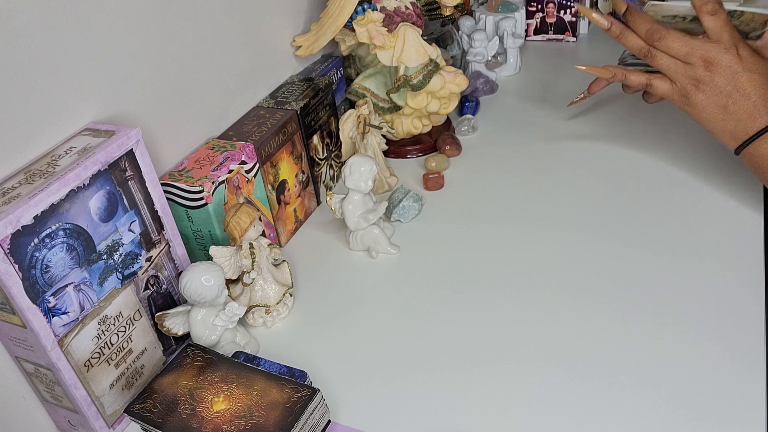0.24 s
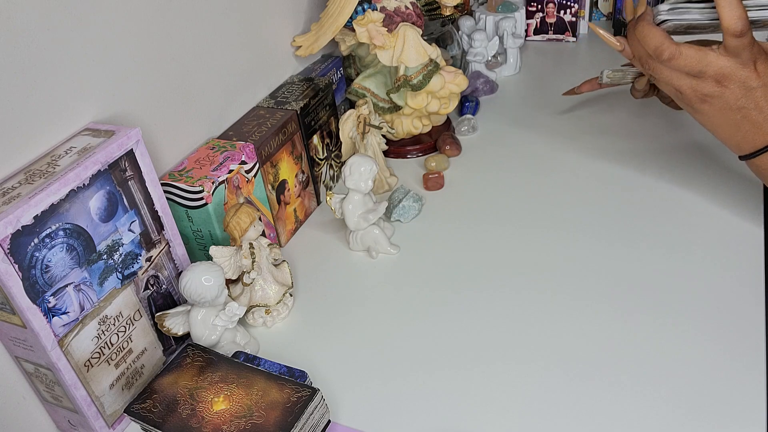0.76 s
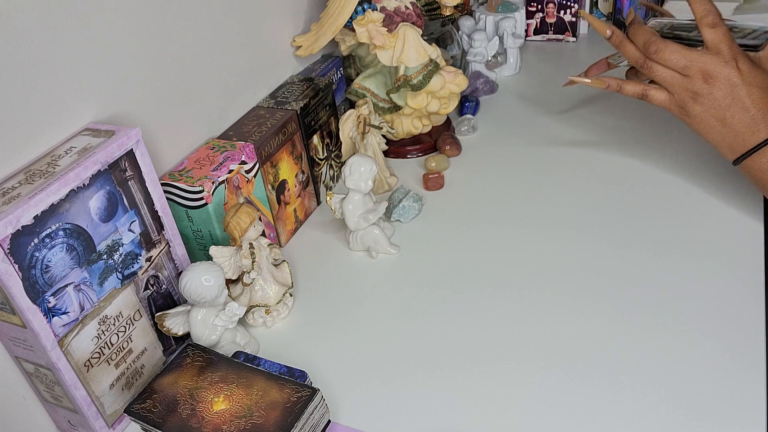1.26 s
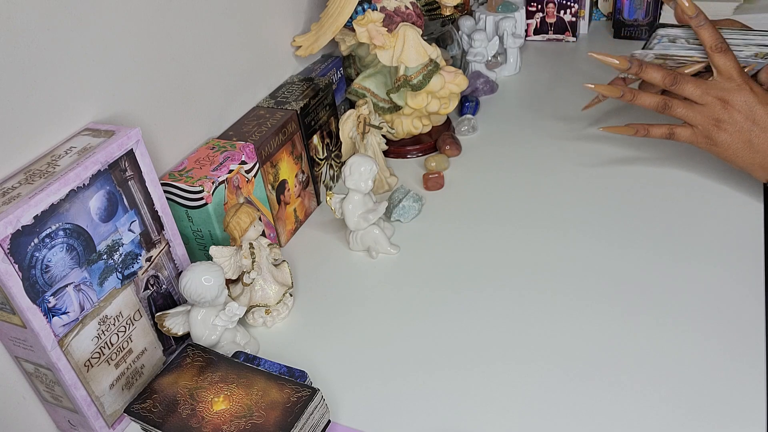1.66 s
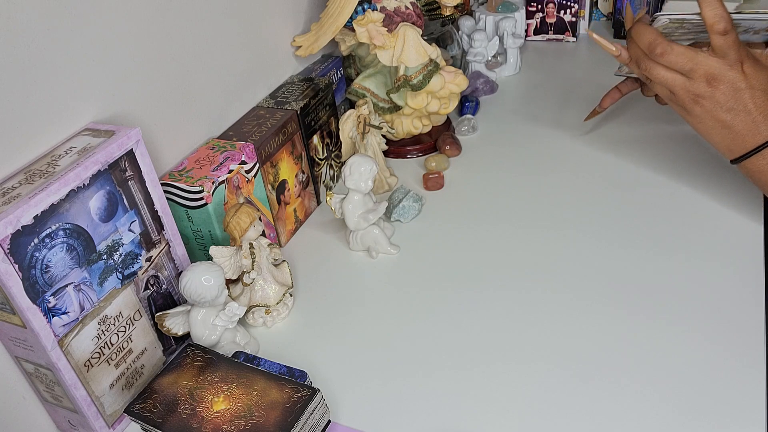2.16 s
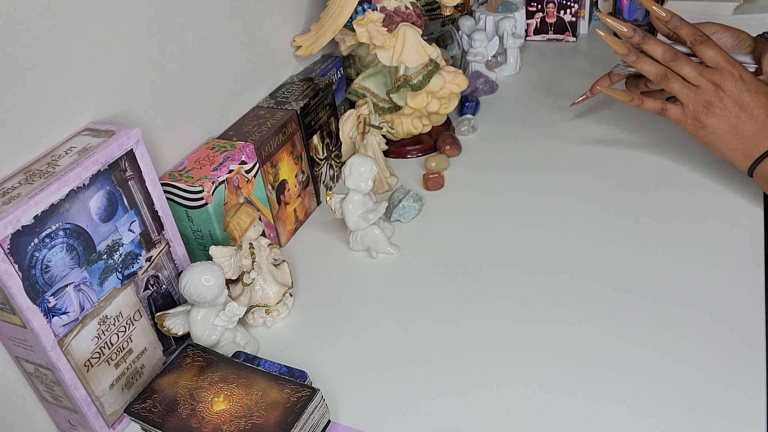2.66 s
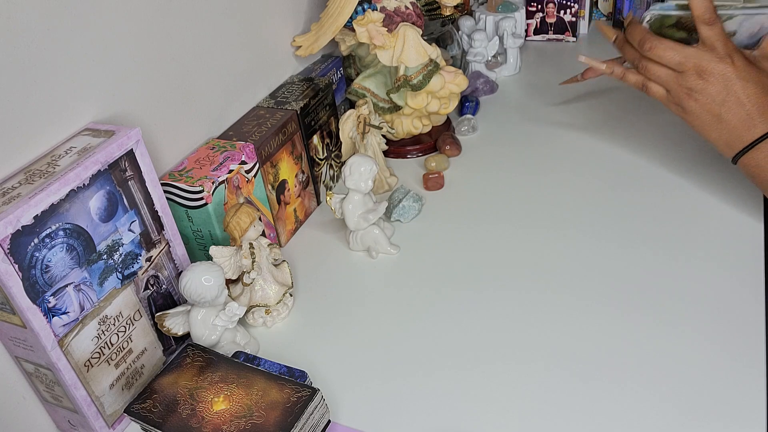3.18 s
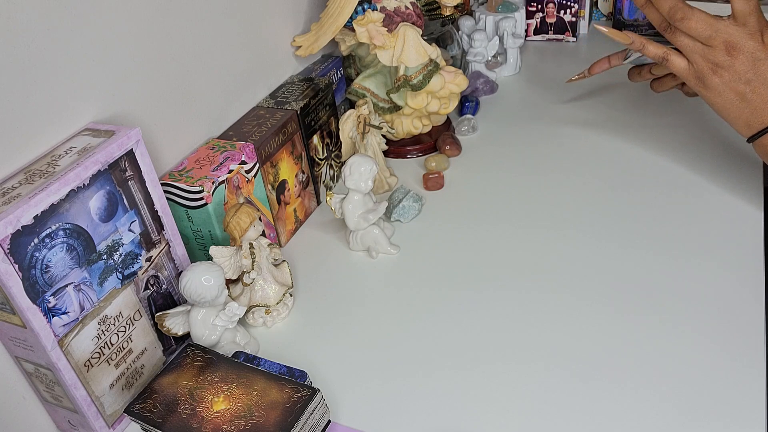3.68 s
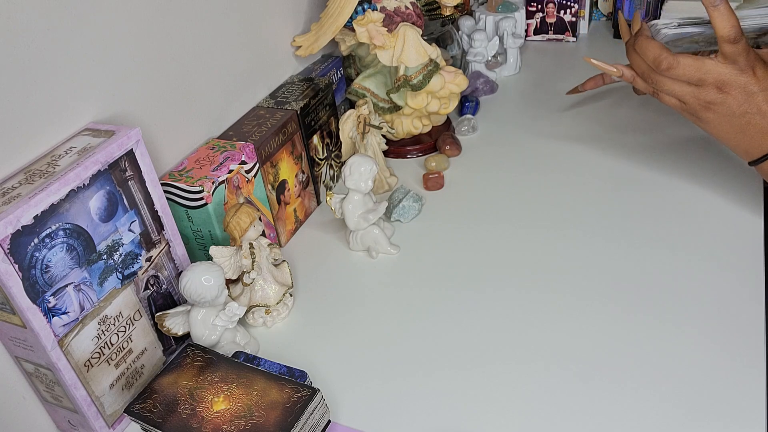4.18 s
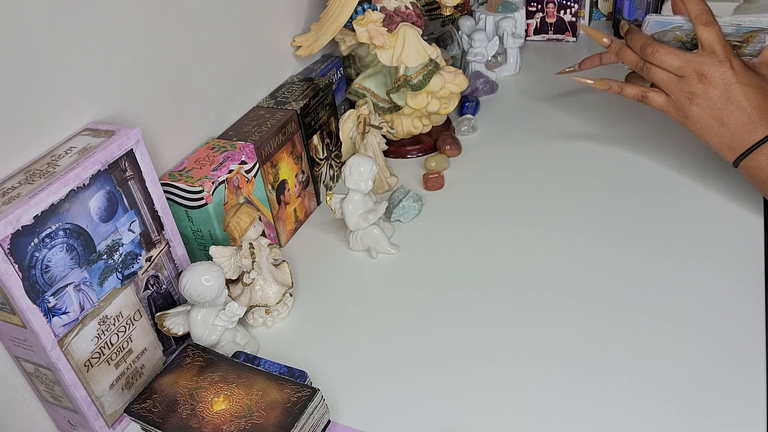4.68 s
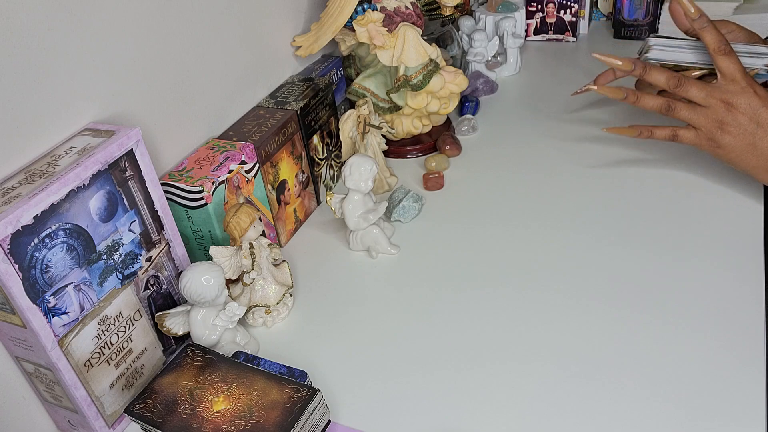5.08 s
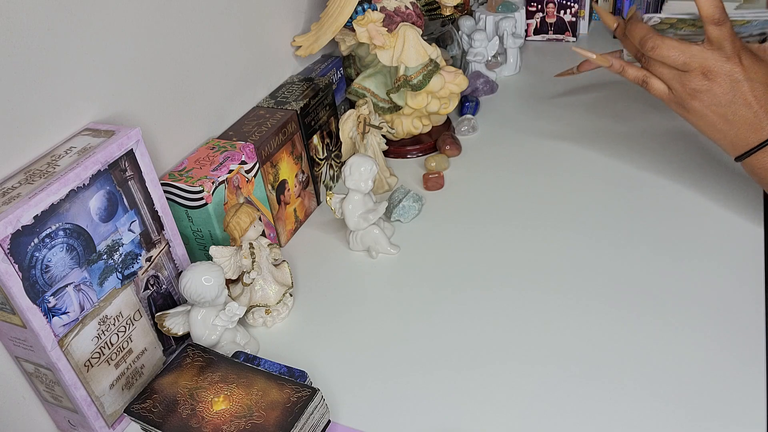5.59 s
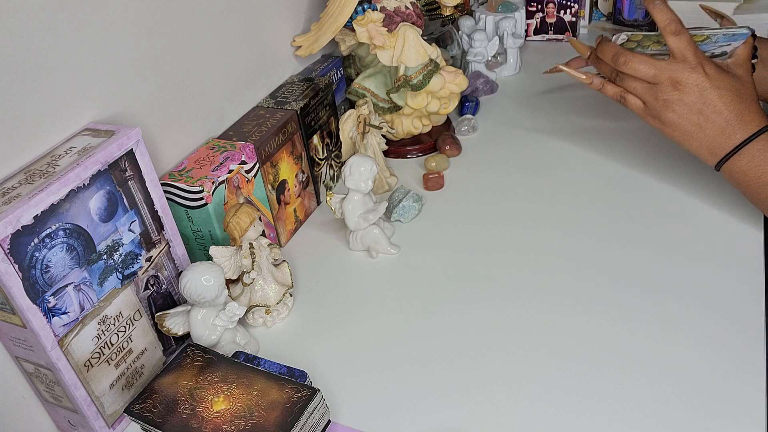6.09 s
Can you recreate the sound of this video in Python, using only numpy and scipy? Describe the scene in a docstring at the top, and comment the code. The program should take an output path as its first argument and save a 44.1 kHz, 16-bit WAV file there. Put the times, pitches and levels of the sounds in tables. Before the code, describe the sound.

Stiff cards clack and slap together about three or four times a second, with faint scrapes between, above a soft pulsing appliance drone.

```python
"""A deck of large cards is shuffled overhand just above a desk in a small room, about 3.5 strokes a second.
A packet is drawn out, then let fall in two or three drops: each snaps on edge, lands flat and rubs to rest.
Snaps are filtered impulses with a short ring; rubs are random clicks and noise; knocks are damped sines.
Room: near echoes, a short noise tail, desk rings. Behind: a throbbing appliance hum and soft air noise."""
import sys
import numpy as np
from scipy import signal
from scipy.fft import rfft, irfft
from scipy.io import wavfile
from scipy.ndimage import uniform_filter1d

SR = 44100
rng = np.random.default_rng(int(sys.argv[2]) if len(sys.argv) > 2 else 0)


def materialize(psi):
    """Save the field psi as 16-bit PCM at rate SR to the path in sys.argv[1].

    A 1-D psi becomes a single channel; in a 2-D psi each row is a channel.
    """
    bounded = np.clip(np.atleast_2d(psi).T, -1, 1)
    quanta = np.round(bounded * 32767).astype(np.int16)
    wavfile.write(sys.argv[1], SR, quanta)


N = 279770
TIME_S = np.arange(N) / SR

# A packet drops edge first, lands flat, rubs to rest; the hand then drags the other cards away.
# Each row: start in seconds, edge blow in relative dB, its ring in Hz, delay of flat blow in seconds,
# flat blow in relative dB, its ring in Hz, rub length in seconds, rub in relative dB, drag in relative dB,
# hollow body offset in dB, crisp treble offset in dB (the grip sets both for the whole stroke).
DROPS = [(0.0138, -9.5, 4350, 0.024, -15.5, 2380, 0.012, -35, -54.5, 1, -1.5),
         (0.288, -30, 5970, 0.018, -34, 4120, 0.044, -45.5, -73, 1.5, 7),
         (0.9023, -1.5, 2150, 0.0083, -3, 2260, 0.059, -41.5, -64, 7, 1),
         (1.186, -13.5, 6130, 0.03, -27, 2170, 0.051, -44.5, -59, 7, 6),
         (1.466, -32, 1830, 0.016, -20.5, 2200, 0.027, -44, -75, 2.5, 2),
         (2.0587, -3.5, 2100, 0.0049, -2, 2100, .039, -37, -50, 0, 2.5),
         (2.341, -24, 1680, 0.021, -17, 1710, 0.03, -46, -54, 5, 6),
         (2.6184, -9, 5140, .003, -33, 1800, 0.018, -44.5, -63, 8.5, 5.5),
         (3.201, 0.5, 3550, .0026, 4, 3254, 0.016, -33, -50.5, 3.5, 0),
         (3.4789, 12.5, 2150, 0.0084, 3, 2100, 0.017, -31, -54, -1, -1.5),
         (3.759, -30, 1640, 0.01, -17.5, 3670, 0.017, -41.5, -64.5, 5.5, 4),
         (4.3635, -10, 4320, 0.0065, -10.5, 1840, 0.032, -39, -44, 1, 0.5),
         (4.6462, 4, 4060, 0.0066, -3.5, 2210, 0.0074, -32, -73, 0.5, 6.5),
         (4.911, -18.5, 1600, 0.037, -19.5, 3900, 0.035, -41, -62, 0, 8),
         (5.4862, -4.5, 5200, 0.025, -5, 3370, 0.05, -36, -47, 3, -1),
         (5.7807, -13, 5200, 0.027, -19, 1370, 0.051, -39, -49.5, 5, -7)]
# A fresh packet is drawn out, scrapes free and taps the deck.
# Each row: scrape start in seconds, draw in relative dB, scrape length in seconds, scrape in relative dB,
# delay of tap in seconds, tap in relative dB, its ring in Hz, hollow body offset in dB, crisp treble offset in dB.
CUTS = [(0.666, -59.5, 0.037, -42.5, 0, -17, 3470, 1.5, 4),
        (1.808, -63.5, 0.047, -45, 0.005, -16.5, 2070, 7.5, 0.5),
        (2.972, -60.5, 0.028, -47.5, .018, -15.5, 2900, 3.5, 2.5),
        (4.138, -60.5, 0.024, -38, 0.027, -13.5, 2200, 6, 3),
        (5.27, -62, .037, -43.5, 0.015, -18, 1600, 11, 0.5),
        (6.208, -59.5, 0.14, -51.5, 0.0091, -20, 2300, 9, -4.5)]


def undb(db):
    """Decibels to gain."""
    return 10 ** (np.asarray(db) / 20)


def unit(x):
    """Scale to an energy of one."""
    return x / np.linalg.norm(x, axis=-1, keepdims=True)


def shape(points, size):
    """Gain of a (Hz, dB) outline on the bins of a transform, interpolated over log frequency."""
    hz, db = np.transpose(points)
    bins_hz = np.maximum(np.fft.rfftfreq(size, 1 / SR), 1)
    return undb(np.interp(np.log(bins_hz), np.log(hz), db))


def colour(x, points):
    """Filter by a (Hz, dB) outline."""
    size = x.shape[-1]
    return irfft(rfft(x) * shape(points, size), size)


def add(out, start_s, x):
    """Mix a sound in at a time."""
    i = max(int(start_s * SR), 0)
    part = x[:max(len(out) - i, 0)]
    out[i:i + len(part)] += part


def fade(t, t60_s):
    """Exponential decay by 60 dB in t60_s."""
    return np.exp(-np.log(1000) * t / t60_s)


def ring(hz, t60_s, size):
    """One decaying mode with an energy of one."""
    t = np.arange(size) / SR
    return unit(np.sin(2 * np.pi * hz * t) * fade(t, t60_s))


def air(air_db=-60):
    """Soft room noise, alike at both ports in the bass and unrelated in the treble."""
    # Each row: frequency in Hz, relative spectral level in dB.
    air_outline = [(20, -33.5), (42, -2), (62, 2), (100, -0.5), (170, -4.5), (300, -11), (480, -10),
                   (1060, -15.5), (1900, -18), (3500, -25), (7000, -36.5), (8600, -30.5), (10500, -43),
                   (16000, -44)]
    mid, side = colour(rng.standard_normal((2, N)), air_outline)
    side = colour(side, [(60, -8.5), (250, -7.5), (700, -1.5), (1500, 0.0)])
    return undb(air_db) * (mid + side * np.array([[1], [-1]])) / np.std(mid)


def walk(rate_hz):
    """Slow smooth chance: held random values, averaged twice."""
    k = int(SR / rate_hz)
    steps = np.repeat(rng.standard_normal(N // k + 1), k)
    return 1.3 * uniform_filter1d(uniform_filter1d(steps, k), k)[:N]


def tone(hz, rms_db, waver_rad, turn, first_throb_s=.005):
    """A steady line whose phase wanders a little."""
    cycles = hz * (TIME_S - first_throb_s) + turn
    return np.sqrt(2) * undb(rms_db) * np.sin(2 * np.pi * cycles + waver_rad * walk(5.5))


def appliance():
    """Low lines beat together about ten times a second; thin overtones swell, then die down after a while."""
    # Motor and mains lines. Each row: frequency in Hz, rms level in dB.
    hum_lines = [(109.4, -69), (120, -59.5), (130.6, -55.7), (141.2, -70), (250.6, -79)]
    # Thin overtones. Each row: frequency in Hz, rms level in dB before the swell.
    whine_lines = [(239.8, -66), (299.5, -78), (359.7, -70), (425.3, -74.5), (479.1, -71.5), (532.9, -75),
                   (624.5, -88)]
    # Overtone swell. Each row: time in seconds, gain in dB.
    whine_swell = [(0, -0.5), (.9, 1.5), (2, -0.5), (2.8, -3), (3.8, -9), (6.3, -5)]
    turn = rng.random()  # shared phase, so the low lines swell together
    hum = sum(tone(hz, db, .3, turn) for hz, db in hum_lines)
    whine = sum(tone(hz, db, .25, rng.random()) for hz, db in whine_lines)
    return hum + whine * undb(np.interp(TIME_S, *np.transpose(whine_swell)))


def room(x, clutter_db=-5, clutter_t60_s=0.018, early_db=3.0, early_t60_s=0.15, late_db=-15, late_t60_s=0.41,
         late_top_db=-8, ring_db=-10, room_db=2.5, size=256):
    """Direct sound, near echoes, scatter from the ornaments, two-stage tail and desk rings at two ports."""
    # Near reflections. Each row: delay in seconds, level in dB against the direct sound.
    echoes = [(.0011, 3), (.0029, -5.5), (.0071, -17), (.0097, -16.5)]
    # Narrow rings of the desk and the things on it. Each row: frequency in Hz, relative level in dB, T60 in seconds.
    desk_modes = [(1675, -20.5, 0.045), (1965, -17, 0.056), (2010, -32.5, 0.12), (3270, -20, 0.04),
                  (5370, -12.5, 0.098), (5670, -21, 0.17)]
    port_lag_s, echo_scatter_s, build_s = .00016, 0.00032, 0.0012
    t = np.arange(SR * 3 // 4) / SR
    clutter, early, late = rng.standard_normal((3, 2, len(t)))
    build = 1 - np.exp(-t / build_s)
    late = colour(late, [(300, 0.82), (2000, 0), (6000, 0.0), (11000, late_top_db)])
    response = undb(clutter_db) * unit(clutter * fade(t, clutter_t60_s))
    response += undb(early_db) * unit(early * build * fade(t, early_t60_s))
    response += undb(late_db) * unit(late * build * fade(t, late_t60_s))
    # hands to the right: direct sound is later at the left port; echoes come from all sides
    for port, lag_s in zip(response, (port_lag_s, 0)):
        add(port, lag_s, np.ones(1))
        for delay_s, db in echoes:
            add(port, delay_s + rng.uniform(0, echo_scatter_s), undb([db]))
    for hz, db, t60_s in desk_modes:
        response += undb(db + ring_db) * ring(hz, t60_s, len(t))
    # flatten broad bands: only the fine ripple of the paths colours the cards
    paths = rfft(np.pad(response, ((0, 0), (size, 0))))
    paths /= np.sqrt(uniform_filter1d(np.abs(paths) ** 2, size))
    wet = signal.fftconvolve(x[None], irfft(paths), axes=1)
    return undb(room_db) * wet[:, size:size + N]


def moving_hands(cards, count=5, shift_s=.08):
    """The hands move shortly before each drop: strokes take turns through slightly different room paths."""
    place = np.searchsorted([row[0] - shift_s for row in DROPS], TIME_S) % count
    return sum(room(cards * (place == k)) for k in range(count))


def shade(ports):
    """The phone's body shades its two ports differently from a source at one side."""
    # Each row: frequency in Hz, left minus right in dB.
    port_balance = [(300, -0.5), (700, -2), (1300, 1), (2300, 1), (4600, -1), (8500, 2), (13000, 0)]
    outlines = [[(hz, sign * db / 2) for hz, db in port_balance] for sign in (1, -1)]
    return np.array([colour(port, outline) for port, outline in zip(ports, outlines)])


def knocks(knock_t60_s=.052, size=6000):
    """The packet bumps the cupped hand, which damps it quickly; each drop jolts the held deck as hard as it lands."""
    # Dull knocks of the whole packet. Each row: start in seconds, pitch in Hz, relative energy in dB.
    hand_knocks = [(1.315, 1124, -29), (1.816, 1384, -17.5), (2.163, 194, -24), (4.122, 813, -21.5),
                   (5.266, 937, -17), (5.325, 246, -19), (5.485, 1554, -15.5), (5.498, 300, -25),
                   (5.818, 1405, -14.5), (5.82, 255, -20)]
    # Modes of the held deck. Each row: frequency in Hz, relative level in dB added to the edge blow, T60 in seconds.
    jolt_modes = [(300, -37, 0.033), (816, -36, 0.018), (1500, -24, 0.027)]
    out = np.zeros(N)
    for start_s, hz, db in hand_knocks:
        add(out, start_s, undb(db) * ring(hz, knock_t60_s, size))
    for start_s, blow_db, *_, hollow_db, _ in DROPS:
        for hz, db, t60_s in jolt_modes:
            add(out, start_s, undb(blow_db + hollow_db + db) * ring(hz, t60_s, size))
    return out


def card_ring(outline, body_db, edge_db, size=1024):
    """Minimum-phase ring of the cards: a flat contact brings out their body, a thin edge their treble."""
    contact = [(2000, body_db), (3300, 0.0039), (6500, 0.0037), (11000, edge_db)]
    cepstrum = irfft(np.log(shape(outline, size) * shape(contact, size)))
    # fold the cepstrum so the ring is causal
    cepstrum[1:size // 2] *= 2
    cepstrum[size // 2 + 1:] = 0
    return unit(irfft(np.exp(rfft(cepstrum))))


def rubs():
    """Every rub as (start s, length s, run-up s, relative dB, hollow dB, crisp dB)."""
    # a dropped packet touches just before it strikes; the drag follows the rub after a pause
    touch_s, drop_run_up_s, drag_pause_s, drag_s = 0.0024, 0.013, 0.02, .058
    # a cut gathers speed more slowly, out of a long faint draw
    draw_s, cut_run_up_s = .135, .03
    rows = []
    for start_s, *_, length_s, rub_db, drag_db, hollow_db, crisp_db in DROPS:
        drag_start_s = start_s + length_s + drag_pause_s
        rows.append((start_s - touch_s, length_s + touch_s, drop_run_up_s, rub_db, hollow_db, crisp_db))
        rows.append((drag_start_s, drag_s, drop_run_up_s, drag_db, hollow_db, crisp_db))
    for start_s, draw_db, length_s, scrape_db, *_, hollow_db, crisp_db in CUTS:
        rows.append((start_s - draw_s, draw_s, cut_run_up_s, draw_db, hollow_db, crisp_db))
        rows.append((start_s, length_s, cut_run_up_s, scrape_db, hollow_db, crisp_db))
    return rows


def slides(catches_per_s=800, release_s=0.0011, slide_db=-4, grip_db=4.0):
    """Paper catches and slips in tiny clicks over a smooth rub, swelling into each rub and stopping short."""
    # What rubbing card faces radiate. Each row: frequency in Hz, relative level in dB.
    paper_outline = [(100, -25.5), (250, -7.5), (600, -12.5), (800, -3.5), (1150, -7), (1600, -5),
                     (2100, -1), (2600, -1), (3300, 4), (5600, 1.5), (7000, -4.5), (8300, -7.5),
                     (10500, -21), (15500, -18.5)]
    # light rubbing is crisp; above pressed_db it dulls
    rub_body_db, rub_edge_db, pressed_db, dull_db_per_db = 1.5, 10, -36.5, 1.15
    boost_db = 3 * np.minimum(rng.exponential(size=N), 3)
    catches = (rng.random(N) < catches_per_s / SR) * rng.standard_normal(N) * undb(boost_db)
    friction = unit(unit(catches) + .5 * unit(rng.standard_normal(N))) * np.sqrt(N)
    bands_hz = np.geomspace(600, 12000, 22)
    out, rows = np.zeros(N), rubs()
    grips = rng.standard_normal((len(rows), len(bands_hz)))
    for (start_s, length_s, run_up_s, db, hollow_db, crisp_db), grip in zip(rows, grips):
        edge_db = crisp_db + rub_edge_db - dull_db_per_db * max(db - pressed_db, 0)
        near = (TIME_S > start_s - 4 * run_up_s) & (TIME_S < start_s + length_s + 6 * release_s)
        t = TIME_S[near] - start_s
        speed = np.exp(2 * np.minimum(t, 0) / run_up_s - np.maximum(t - length_s, 0) / release_s)
        # every new grip shifts the resonances of the cards
        paper = np.pad(card_ring(paper_outline, rub_body_db + hollow_db, edge_db), 64)
        paper = unit(colour(paper, np.c_[bands_hz, grip_db * grip]))
        rub = signal.fftconvolve(friction[near] * speed, paper)
        add(out, TIME_S[near][0], undb(db + slide_db) * rub)
    return out


def blows(count=3):
    """Every blow as (s, relative dB, ring Hz, hollow dB, crisp dB): flicks, two a drop, one a cut, ticks in rubs."""
    # Single cards that flick between strokes. Each row: start in seconds, relative energy in dB, ring in Hz.
    flicks = [(0.13, -28, 2000), (0.596, -24.5, 2010), (.9782, -18, 2150), (1.314, -29, 4680),
              (2.44, -30, 1990), (3.797, -21, 2250), (4.123, -21.5, 5730), (5.122, -32.5, 5030),
              (5.197, -33, 6800), (5.3223, -24.5, 4550), (5.6702, -19.5, 1650), (6.001, -26.5, 4280),
              (6.053, -22.5, 2030), (6.257, -21, 2380)]
    # loose edges tick in each rub: level over the rub, its scatter, middle ring (pitch spreads about an octave)
    stray_db, stray_scatter_db, stray_hz = 13.5, 4, 2810
    rows = [(start_s, db, hz, 0, 0) for start_s, db, hz in flicks]
    for start_s, edge_db, edge_hz, after_s, flat_db, flat_hz, *_, hollow_db, crisp_db in DROPS:
        rows.append((start_s, edge_db, edge_hz, hollow_db, crisp_db))
        rows.append((start_s + after_s, flat_db, flat_hz, hollow_db, crisp_db))
    for start_s, *_, after_s, db, hz, hollow_db, crisp_db in CUTS:
        rows.append((start_s + after_s, db, hz, hollow_db, crisp_db))
    for start_s, length_s, _, db, hollow_db, crisp_db in rubs():
        for when, force, octaves in rng.uniform(-1.1, 1, (count, 3)):
            tick_s = start_s + length_s * (1 + when) / 2
            tick_db = db + stray_db + stray_scatter_db * force
            rows.append((tick_s, tick_db, stray_hz * 2 ** octaves, hollow_db, crisp_db))
    return rows


def snaps(patter_s=0.0012, patter=1.3, snap_db=-1, size=400):
    """The leading card hits first and rings as it flexes; the rest patter in within a few milliseconds."""
    # What the struck deck radiates. Each row: frequency in Hz, relative level in dB.
    deck_outline = [(100, -34.5), (250, -46), (520, -29.5), (820, -17), (1080, -22.5), (1600, -5.5),
                    (2100, 0), (2550, -13.5), (3220, -1), (4450, -8), (5650, -5.5), (6800, -14),
                    (8000, -13), (10500, -31.5), (15500, -31)]
    # lower-ringing or softer blows are hollower; softness is minus the blow's dB
    neutral_hz, body_db_per_octave, body_db_per_soft_db = 2630, 12.5, 0.04
    blow_edge_db, edge_db_per_soft_db = 4.5, 0.18
    flex_share_db, flex_db_per_soft_db = -14, 0.69
    out, t, rows = np.zeros(N), np.arange(size) / SR, blows()
    chances = rng.standard_normal((len(rows), size))
    for (start_s, db, hz, hollow_db, crisp_db), chance in zip(rows, chances):
        octaves_below = np.log2(neutral_hz / hz)
        body_db = hollow_db + body_db_per_octave * octaves_below - body_db_per_soft_db * db
        edge_db = crisp_db + blow_edge_db - edge_db_per_soft_db * db
        blow = patter * unit(chance * np.abs(chance) * np.exp(-t / patter_s))
        blow[0] += 1
        crack = unit(np.convolve(blow, card_ring(deck_outline, body_db, edge_db)))
        # lossy card stock: 60 dB down in 20 cycles
        flex = ring(hz, 20 / hz, len(crack))
        flex_gain = undb(flex_share_db - flex_db_per_soft_db * db)
        add(out, start_s, undb(db + snap_db) * unit(crack + flex_gain * flex))
    return out


def scene(knock_room_db=-8, knock_direct_db=-4):
    """Cards in the room over the hum and the air; the dull knocks arrive mostly direct."""
    bumps = knocks()
    cards = snaps() + slides() + undb(knock_room_db) * bumps
    return shade(moving_hands(cards)) + undb(knock_direct_db) * bumps + appliance() + air()


def record(dry, full_scale=.92, top_hz=15950):
    """Peaks are rounded smoothly near full scale; the phone cuts the top with a steep low-pass."""
    rounded = dry / (1 + (dry / full_scale) ** 6) ** (1 / 6)
    low_pass = signal.ellip(10, .2, 70, top_hz, fs=SR, output="sos")
    return signal.sosfilt(low_pass, rounded)


dry = scene()
out = record(dry)
materialize(out)
```